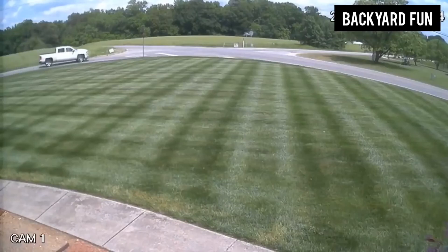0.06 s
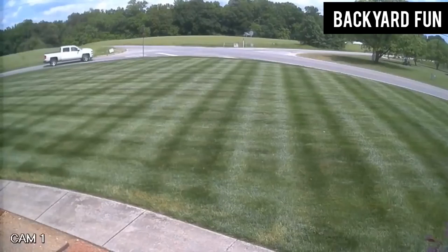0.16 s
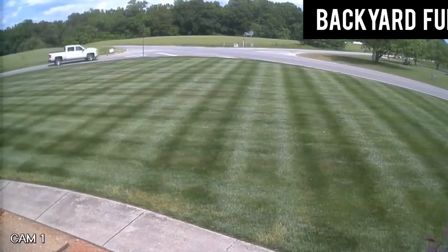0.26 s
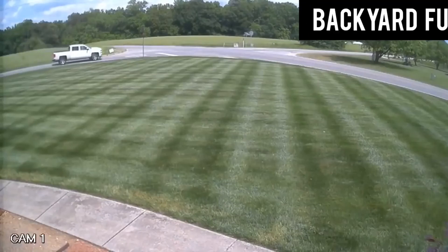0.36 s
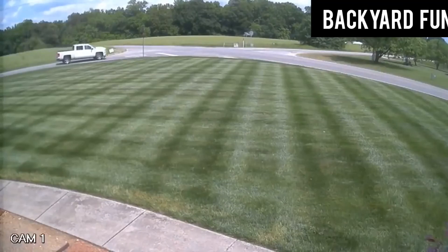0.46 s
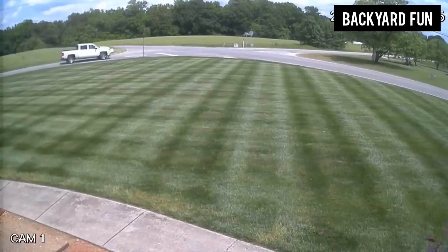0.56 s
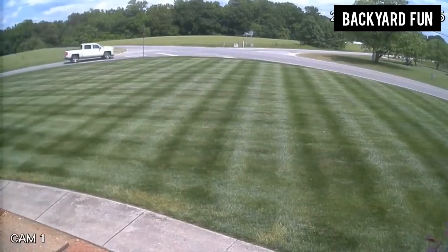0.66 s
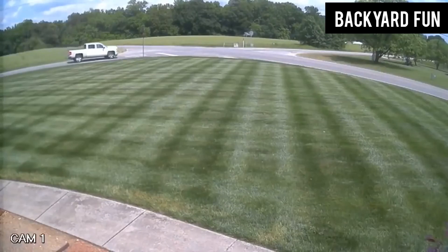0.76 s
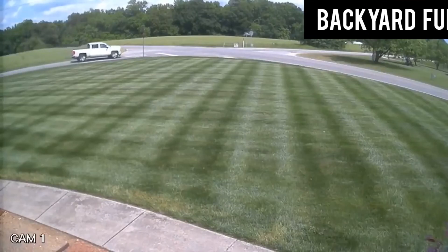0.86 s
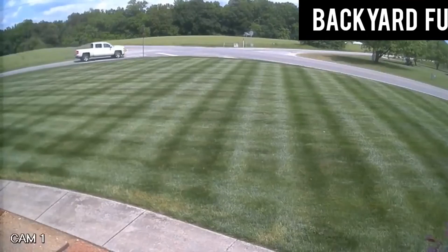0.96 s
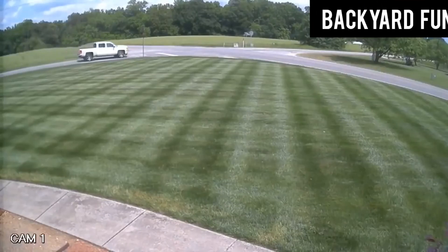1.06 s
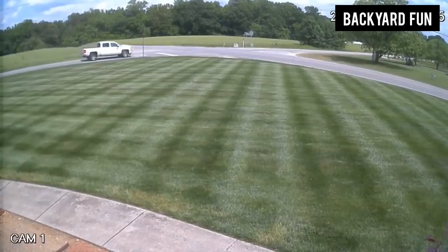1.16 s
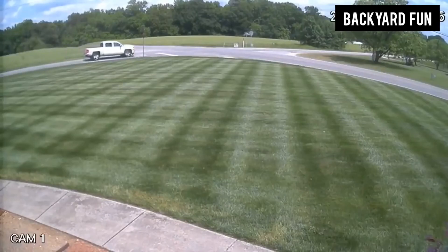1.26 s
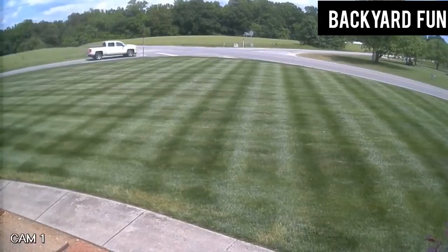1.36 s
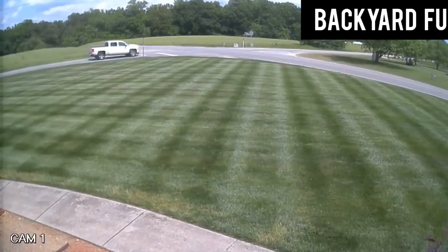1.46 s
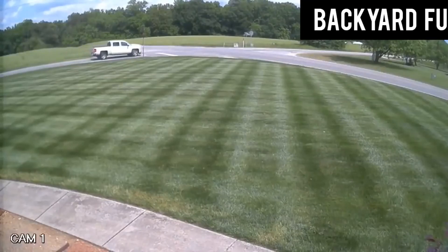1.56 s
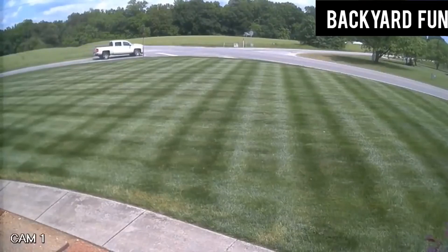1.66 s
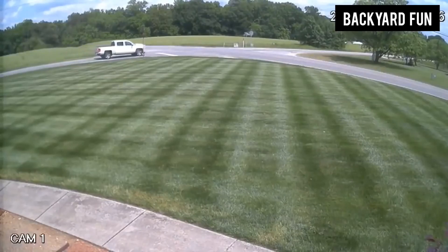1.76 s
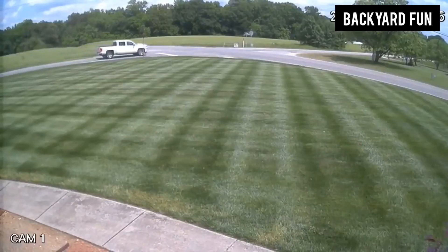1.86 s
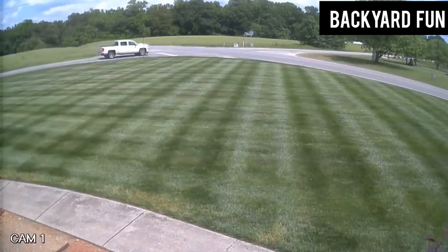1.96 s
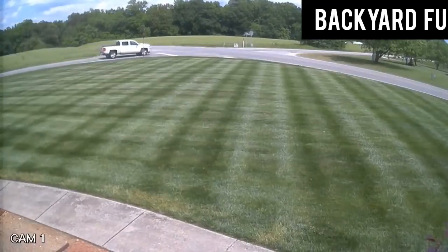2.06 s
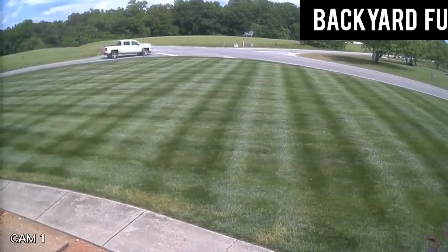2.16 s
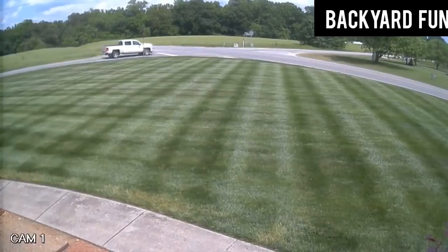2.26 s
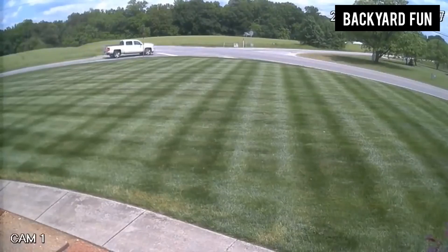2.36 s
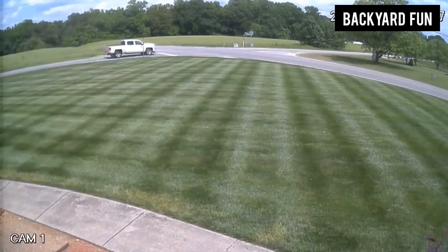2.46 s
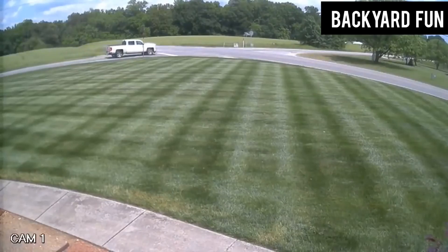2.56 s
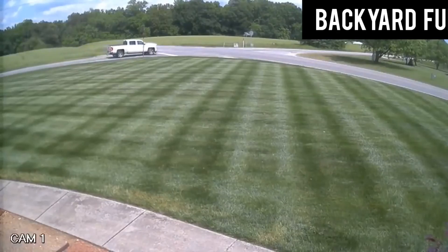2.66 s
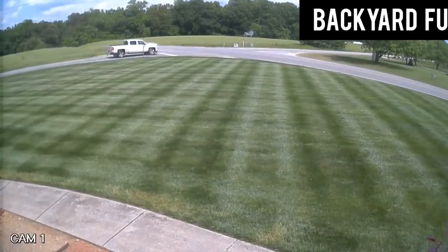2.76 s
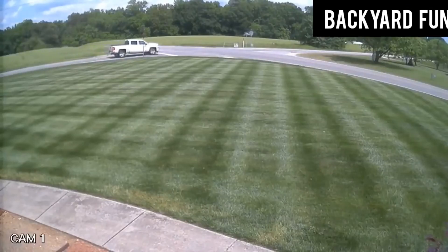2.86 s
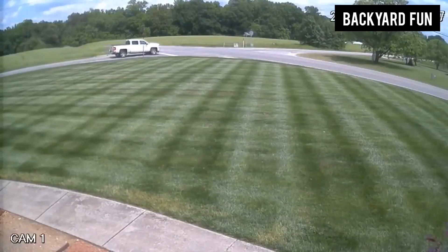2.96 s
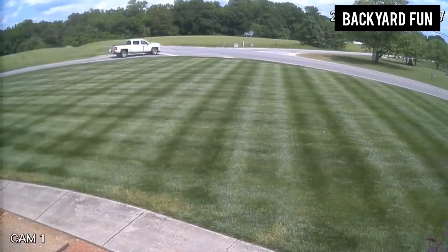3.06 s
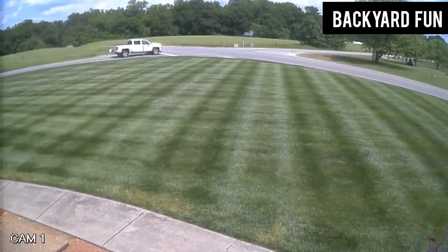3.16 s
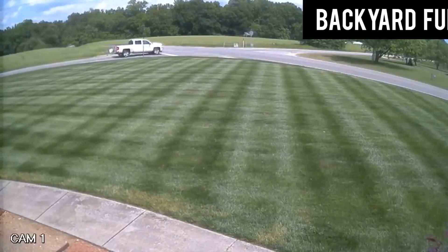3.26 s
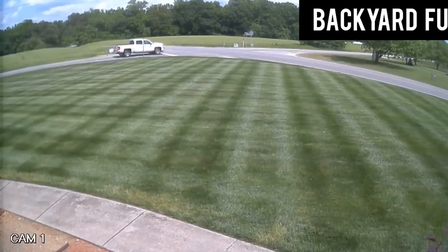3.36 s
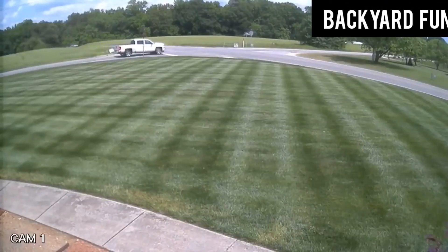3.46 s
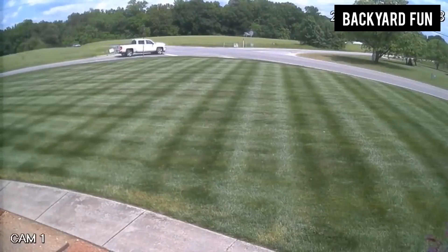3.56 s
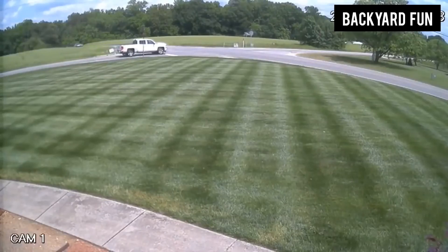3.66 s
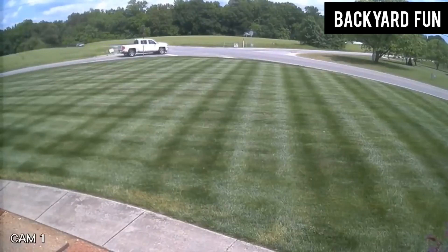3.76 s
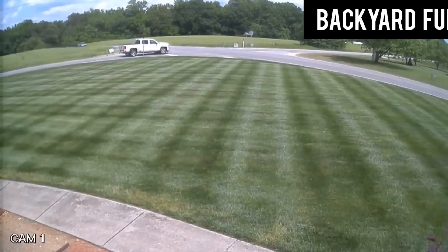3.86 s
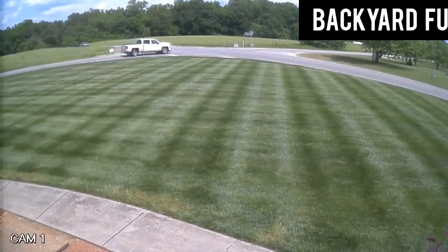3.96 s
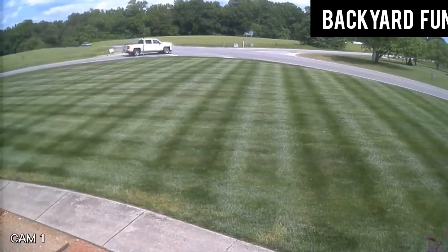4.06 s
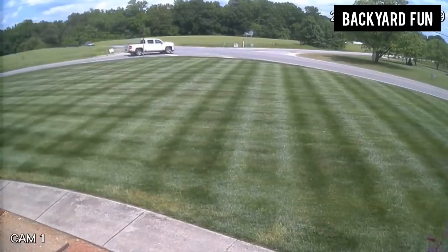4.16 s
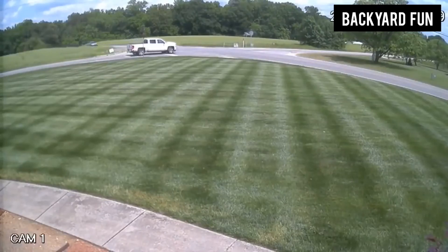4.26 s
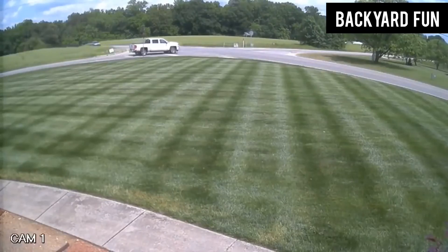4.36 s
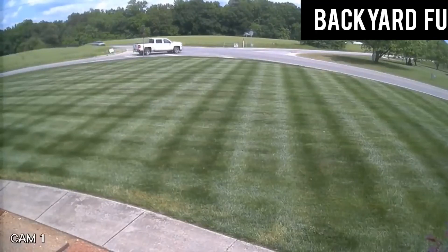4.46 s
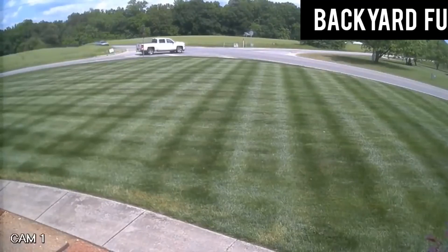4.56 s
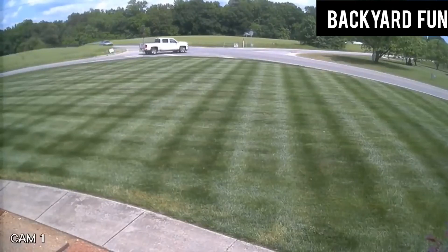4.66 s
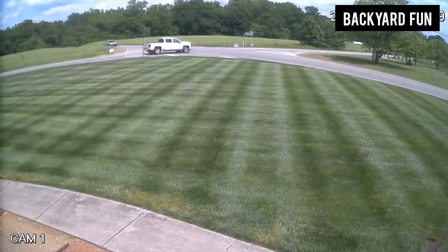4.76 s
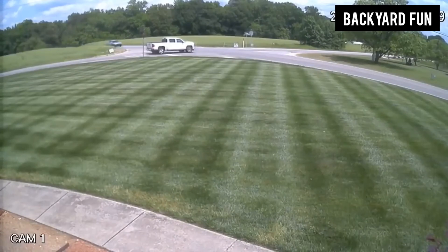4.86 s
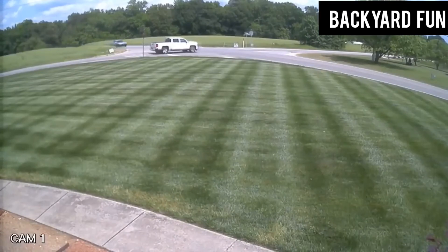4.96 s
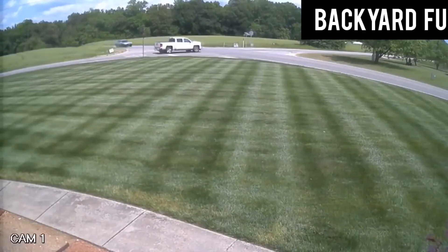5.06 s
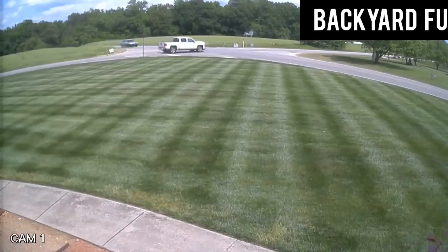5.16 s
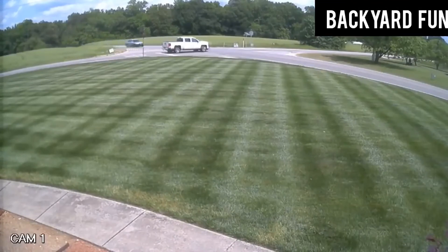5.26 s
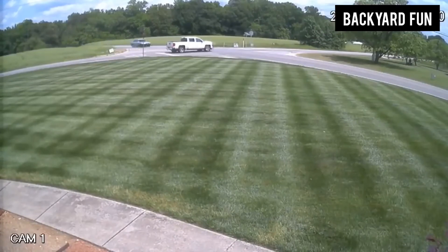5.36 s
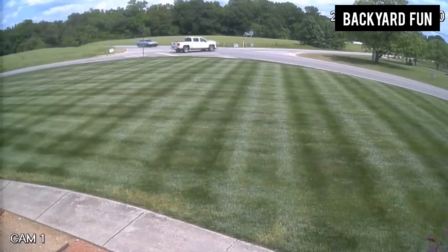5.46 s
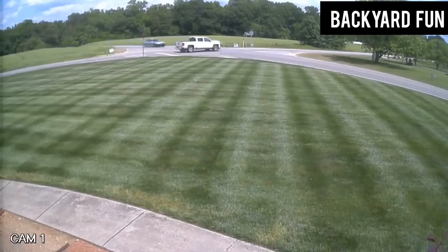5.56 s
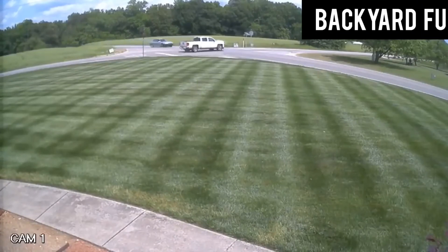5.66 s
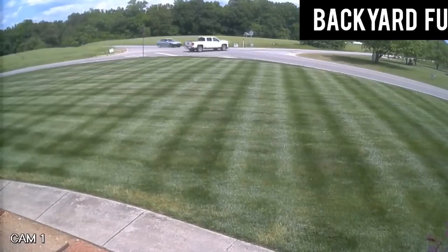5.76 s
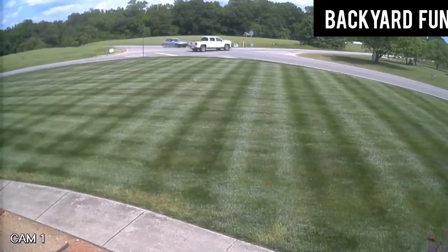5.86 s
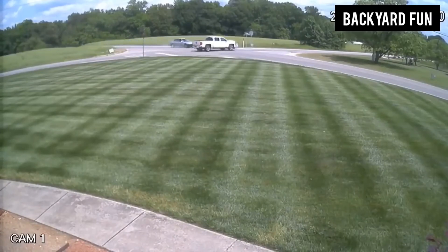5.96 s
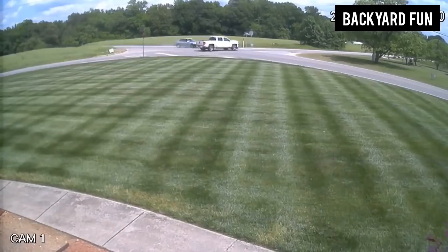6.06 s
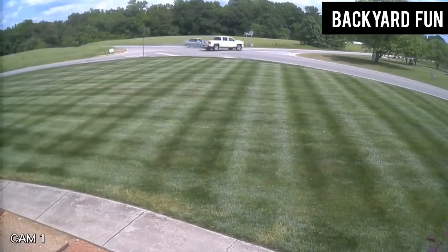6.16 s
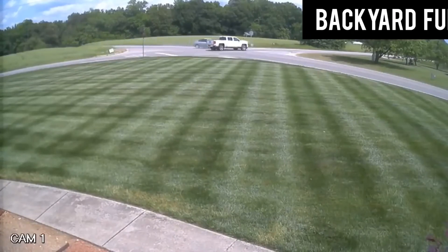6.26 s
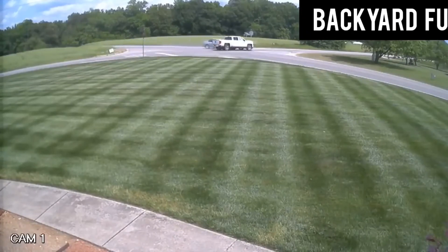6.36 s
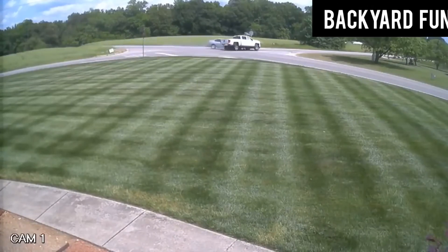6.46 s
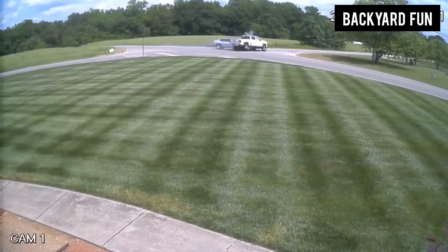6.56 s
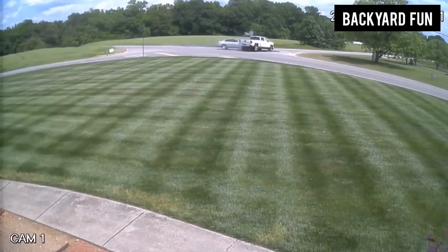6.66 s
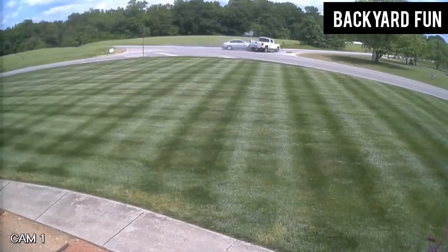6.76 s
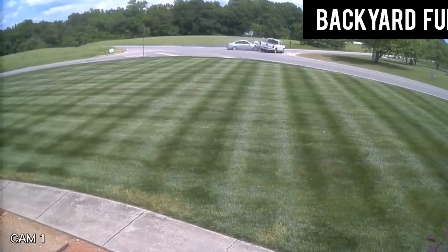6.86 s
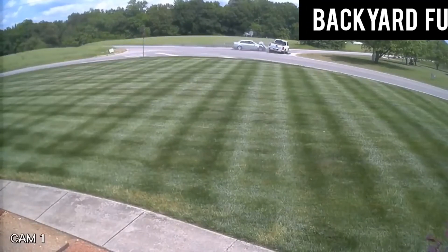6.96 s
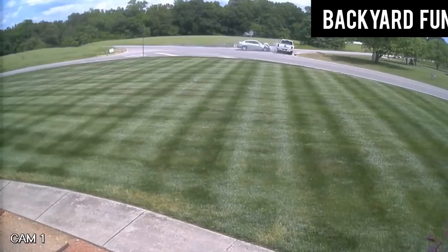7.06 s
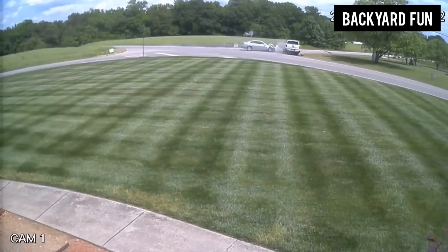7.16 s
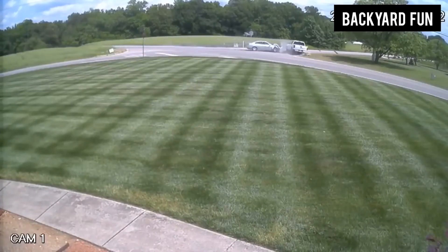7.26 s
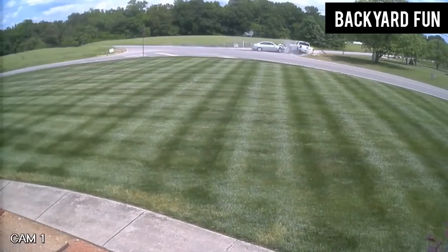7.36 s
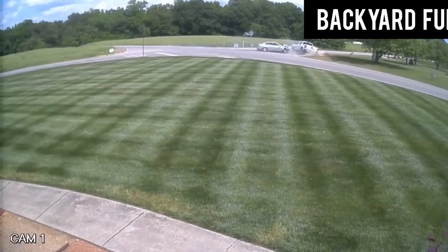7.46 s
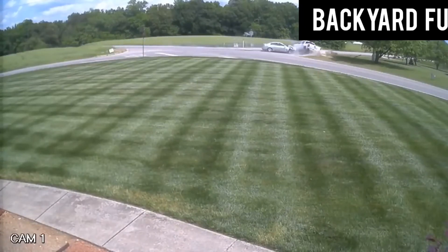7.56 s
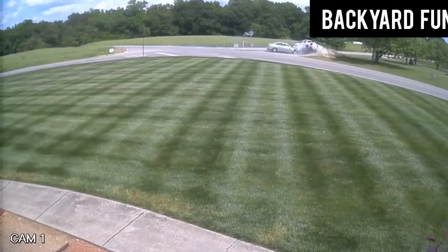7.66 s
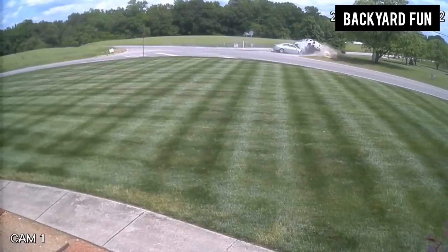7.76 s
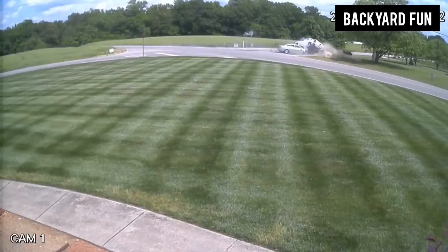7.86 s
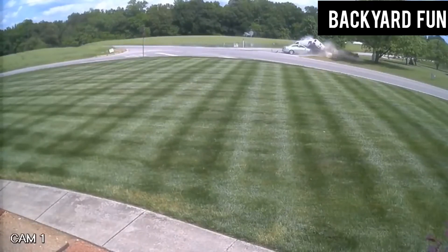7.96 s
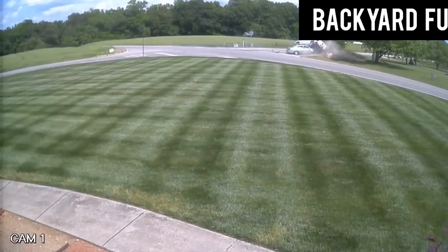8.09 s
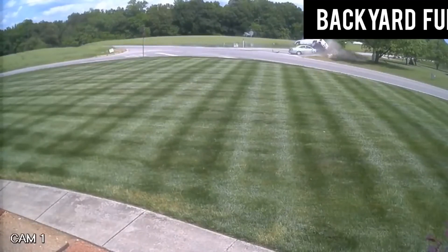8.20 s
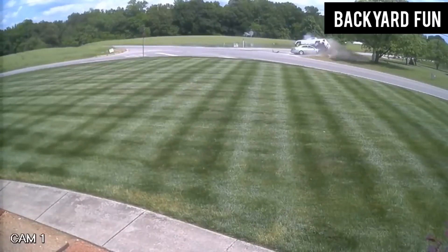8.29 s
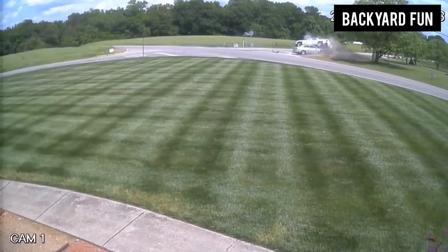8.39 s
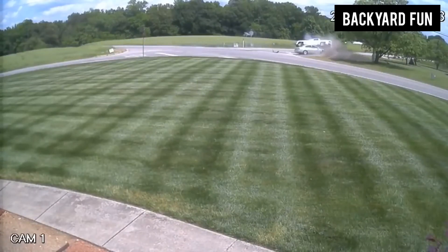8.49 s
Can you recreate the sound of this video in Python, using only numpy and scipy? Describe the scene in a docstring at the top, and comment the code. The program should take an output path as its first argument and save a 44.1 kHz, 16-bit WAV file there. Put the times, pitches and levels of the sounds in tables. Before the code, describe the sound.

Quiet roadside engine hum swells as a car nears; locked tyres squeal, two vehicles smash loudly, and wreckage howls, clanks, tumbles and lands.

```python
"""A country junction beside a lawn: a pickup rolls up while a car approaches fast.
Engines are flickering harmonics over noise for road and air; tyres chirp and squeal as shaky stick-slip tones.
The two collide in short ringing noise bursts; metal crunches and groans as they slide, built from random grains,
and the pickup tumbles and lands twice with noise thuds. Spectra fall steeply above about 2 kHz for most layers,
and the small security camera microphone overloads with bright crackle and rounds the peaks."""
import sys
import numpy as np
from scipy import signal
from scipy.fft import rfft, irfft, next_fast_len
from scipy.io import wavfile

SR = 44100
rng = np.random.default_rng(int(sys.argv[2]) if len(sys.argv) > 2 else 0)


def wrap_up_sound(samples):
    """Save the sound to the file named by the first command line argument, as 16-bit audio."""
    columns = np.atleast_2d(samples).T
    # keep every value between -1 and 1, then stretch to whole-number steps
    tamed = np.clip(columns, -1, 1)
    steps = np.round(tamed * 32767).astype(np.int16)
    wavfile.write(sys.argv[1], SR, steps)


N = 376173
T = np.arange(N) / SR


def amp(db):
    """Decibels to gain."""
    return np.exp(np.asarray(db) * (np.log(10) / 20))


def unit(x):
    """Scale to rms 1."""
    return x / np.sqrt(np.mean(x ** 2) + 1e-20)


def curves(table):
    """Columns of a table as per-sample controls, the first column being time."""
    s, *columns = np.transpose(table)
    return [np.interp(T, s, c) for c in columns]


def between(start, end, fade=0.0073):
    """1 from start to end, with short ramps outside."""
    return np.clip((T - start) / fade + 1, 0, 1) * np.clip((end - T) / fade + 1, 0, 1)


def swell(start, hold, attack_s, release_s):
    """Full strength from start for hold seconds; attack and release are the times for 20 dB."""
    before = np.maximum((start - T) / attack_s, 0)
    after = np.maximum((T - start - hold) / release_s, 0)
    return 10 ** -np.minimum(before + after, 10)


def swells(table, attack_s, release_s):
    """Joint strength of (time, hold, level) events, added as powers, that share one attack and release."""
    return np.sqrt(sum((amp(db) * swell(start, hold, attack_s, release_s)) ** 2 for start, hold, db in table))


def colour(x, points):
    """Filter by a spectrum that rolls off past its last point, keeping the power of white noise."""
    hz, db = np.transpose(points)
    size = next_fast_len(N + 4096)
    f = np.maximum(np.arange(size // 2 + 1) * SR / size, 1)
    gain = amp(np.interp(np.log(f), np.log(hz), db)) * np.minimum(hz[-1] / f, 1)
    return irfft(rfft(x, size) * unit(gain), size)[:N]


def noise(points):
    """Steady coloured noise of about rms 1."""
    return colour(rng.standard_normal(N), points)


def walk(rate):
    """Smooth random control with about rate turns a second and rms 1."""
    return unit(np.interp(T * rate, np.arange(N // 20), rng.standard_normal(N // 20)))


def grains(rate, spread_db):
    """Random clicks, rate a second; spread_db sets how unequal their sizes are."""
    hit = rng.random(N) < rate / SR
    size = amp(spread_db * np.minimum(rng.exponential(size=N), 4))
    return unit(hit * size * rng.standard_normal(N))


def porch(x, share=0.38, decay_s=.014):
    """Walls and eaves near the microphone add a few faint early reflections, which ripple the spectrum."""
    t = T[:SR // 16]
    hits = rng.random(len(t)) < 900 / SR
    taps = hits * rng.standard_normal(len(t)) * np.exp(-t / decay_s) * (t > .004)
    taps = signal.sosfilt(signal.butter(1, 400, "high", fs=SR, output="sos"), taps)
    reflections = signal.fftconvolve(x, taps * share / np.linalg.norm(taps))[:N]
    return (x + reflections) / np.hypot(1, share)


# outdoor hiss: tone as (frequency [Hz], relative density [dB])
AIR_TONE = [(200, -4), (900, -3), (2100, 1), (2800, -9), (3200, -20.5), (4000, -27), (4700, -48),
            (5900, -48.5), (7000, -61.5), (15000, -66.5)]
# its course: (time [s], level [dB])
AIR_LEVEL = [(0, -42.5), (1, -42.5), (1.7, -47.5), (4, -47)]


def air():
    """Outdoor air as broadband hiss with slow level changes."""
    return porch(noise(AIR_TONE), share=0.47) * amp(curves(AIR_LEVEL)[0])


# road noise: a steady distant bed, and the car's share, which grows until it is near
NEAR_S = 5.295


def road(far_db, near_db, rise_s):
    """Strength of a steady distant bed plus a car that draws near."""
    return np.hypot(amp(far_db), amp(near_db) * swell(NEAR_S, T[-1], rise_s, 1))


# low road noise: (frequency [Hz], relative density [dB])
RUMBLE_TONE = [(20, -28), (40, -6.5), (70, 0), (105, -3.5), (130, -1), (200, -4.5), (235, -4.5), (300, -12),
               (360, -8.5), (480, -23.5), (800, -27), (2000, -70.5)]


def rumble():
    """Low road noise, gently unsteady, that swells as the car nears."""
    return noise(RUMBLE_TONE) * road(far_db=-37, near_db=-31, rise_s=3.9) * amp(0.91 * walk(10))


# tyre roar: (frequency [Hz], relative density [dB])
ROAR_TONE = [(300, -6), (600, -1), (740, -2), (880, 5.5), (1010, -3.5), (1130, 0.5), (1280, -3.5),
             (1540, 5), (1700, 1), (1920, 3), (2150, -5.5), (2450, -20), (3300, -34.5), (5000, -74.5)]


def roar():
    """Tyre roar in the mid range, rippled by reflections and swelling as the car nears."""
    return porch(noise(ROAR_TONE), share=0.36) * road(far_db=-39.5, near_db=-29.5, rise_s=2.34) * amp(.5 * walk(9.7))


def engine(table, orders, wobble, flutter_db):
    """Harmonics brighten above the second under load; speed hunts and each line flutters over the lawn."""
    hz, db, load_db = curves(table)
    phase = 2 * np.pi * np.cumsum(hz * (1 + wobble * walk(14))) / SR
    lines = np.zeros(N)
    for k, line_db in orders:
        strength = amp(line_db + load_db * (k > 2) + flutter_db * walk(11))
        lines += strength * np.sin(round(k) * phase + 2 * np.pi * rng.random())
    return unit(lines) * amp(db)


# distant machine: (time [s], fundamental [Hz], level [dB], load: lift of the upper harmonics [dB])
HUM_COURSE = [(0, 86, -39, 3), (2.2, 85.8, -39, 1), (6.5, 86.1, -45, -2.5)]
# its harmonics: (multiple, relative level before load [dB])
HUM_ORDERS = [(1, -0.5), (2, 0), (3, -12), (4, -15), (6, -23.5)]


def distant_hum():
    """A distant machine hums on a few harmonics and fades."""
    return engine(HUM_COURSE, HUM_ORDERS, wobble=.015, flutter_db=3)


# swells of the exhaust: (time [s], hold [s], level [dB])
BOOMS = [(2.78, 0.11, -36), (3.2, .1, -41), (3.74, .2, -35.5), (4.5, .08, -34.5)]


def exhaust_boom():
    """The exhaust booms in swells at one slightly wavering resonance."""
    tone = engine([(0, 52.5, 0, 0)], [(1, 0)], wobble=.06, flutter_db=1.5)  # 52.5 Hz
    return tone * swells(BOOMS, attack_s=.2, release_s=0.66)


# pickup: (time [s], half the firing rate [Hz], level [dB], load: lift of the upper harmonics [dB])
PICKUP_COURSE = [(0, 73.13, -42.5, -12.5), (2, 71.92, -32.5, -11), (3.6, 70.63, -32.5, -1.5),
                 (4.85, 70.22, -33.5, 6), (5.8, 64.6, -50, -1.5)]
# its harmonics: (multiple, relative level before load [dB])
PICKUP_ORDERS = [(1, -10.5), (2, 2), (3, -7), (4, -11.5), (5, -14), (6, -13), (7, -28.5), (9, -20)]


def pickup():
    """The pickup's engine on multiples of half its firing rate."""
    return engine(PICKUP_COURSE, PICKUP_ORDERS, wobble=.005, flutter_db=2.5)


# approaching car: (time [s], firing rate [Hz], level [dB], load: lift of the upper harmonics [dB])
CAR_COURSE = [(0, 127.8, -54, -10), (2.5, 128, -41, -9.5), (4.7, 123.2, -32, -0.5),
              (5.5, 113.6, -36.5, 0.5), (6.4, 97.2, -52.5, -0.5)]
# its harmonics: (multiple, relative level before load [dB])
CAR_ORDERS = [(1, 0.5), (2, -8.5), (3, -19.5), (4, -16)]


def car():
    """The approaching car's engine on multiples of its firing rate."""
    return engine(CAR_COURSE, CAR_ORDERS, wobble=.004, flutter_db=2)


def traffic():
    """Engines, hum, boom and road noise together, gone within milliseconds as the collision begins."""
    return (pickup() + car() + distant_hum() + exhaust_boom() + rumble() + roar()) * between(0, 6.46)


# chassis tone: (frequency [Hz], relative density [dB])
SHUDDER_TONE = [(15, -26), (28, -2.5), (42, 3.5), (75, 4), (120, -4.5), (300, -57)]
# chassis shaken under braking and impact: (time [s], hold [s], level [dB])
SHUDDERS = [(5.65, 0.78, -30.5), (6.47, .13, -23), (6.82, .1, -30), (8.19, .08, -25.5)]


def shudder():
    """The chassis shakes at each heavy load, as deep noise."""
    return noise(SHUDDER_TONE) * swells(SHUDDERS, attack_s=0.035, release_s=.25)


def squeal(hz, jitter, jitter_rate, flutter_db, second_db, third_db):
    """Stick-slip oscillation of rms 1: the grip changes all the time, so pitch and strength shake."""
    phase = 2 * np.pi * np.cumsum(hz * (1 + jitter * walk(jitter_rate))) / SR
    second = amp(second_db + 2.6 * walk(60)) * np.sin(2 * phase)
    third = amp(third_db) * np.sin(3 * phase)
    return unit((np.sin(phase) + second + third) * amp(flutter_db * walk(110)))


# wheels locking: (time [s], hold [s], pitch [Hz], level [dB], pitch shake [share])
CHIRPS = [(5.49, 0.024, 1950, -17, .035), (5.525, 0.0056, 1994, -10, .035), (5.555, 0.019, 1957, -5, .04),
          (5.588, .07, 2523, -27.5, .08)]


def chirps():
    """Rough high stick-slip chirps as the wheels lock."""
    out = np.zeros(N)
    for start, hold, hz, db, shake in CHIRPS:
        chirp = squeal(hz, jitter=shake, jitter_rate=550, flutter_db=1.2, second_db=-41, third_db=-51.0)
        out += chirp * amp(db) * swell(start, hold, attack_s=0.035, release_s=0.031)
    return out


# how hard the locked tyres bear on the road: (time [s], load [0-1])
BRAKE_LOAD = [(5.46, 0.01), (5.6, .68), (5.86, .6), (5.96, 0.91), (6.12, 0.99), (6.22, 0.62), (6.46, 0.06)]
# scrubbing rubber: (frequency [Hz], relative density [dB])
SKID_TONE = [(30, -15.5), (170, 2), (300, -10.5), (550, -18.5), (900, -6.5), (1150, -4), (1430, 1),
             (1650, -7.5), (1930, 4), (2200, -2.5), (2600, -15.5), (3600, -38), (4900, -53), (5900, -51),
             (7500, -65.5), (9900, -62), (15000, -80)]
# bright overload noise, also played by snaps and wreck: (frequency [Hz], relative density [dB])
OVERLOAD_TONE = [(1500, -11), (3000, 12), (4200, -2), (5700, -5.5), (7500, -17), (10000, -23),
                 (15000, -34.5)]
FRONT_HZ, REAR_HZ = 1216, 1136  # unloaded tread pitches
TREAD_SAG = .07  # share by which full load lowers them
SCRUB_DB, RASP_DB = -14.5, -43.5  # at full load, before the judder
SCRUB_RANGE_DB, RASP_RANGE_DB = 14, 43.5  # drop from full load to none


def braking():
    """Two treads, lower under load, squeal over scrub, wheel judder and the rasp of the overloaded microphone."""
    load, = curves(BRAKE_LOAD)
    sag = 1 - TREAD_SAG * load
    # the front tread squeals first, the rear joins near full load
    front = squeal(FRONT_HZ * sag, jitter=.022, jitter_rate=340, flutter_db=2.4, second_db=-23, third_db=-52)
    front *= amp(-14) * swell(5.685, 0.48, attack_s=0.12, release_s=.42)
    rear = squeal(REAR_HZ * sag, jitter=.022, jitter_rate=260, flutter_db=3.5, second_db=-1, third_db=-46.5)
    rear *= amp(-15.5) * swell(5.93, 0.21, attack_s=0.12, release_s=0.12)
    scrub = noise(SKID_TONE) * amp(SCRUB_DB + SCRUB_RANGE_DB * (load - 1))
    # bright rasp of the overloaded microphone, growing steeply with load
    rasp = colour(grains(rate=10000, spread_db=0.0), OVERLOAD_TONE)
    rasp *= amp(RASP_DB + RASP_RANGE_DB * (load - 1))
    judder = amp(1.3 * walk(90))
    return porch(front + rear + scrub + rasp) * judder * between(5.49, T[-1], fade=.06) * between(0, 6.455)


# short bright snaps: (time [s], level before a 3 dB trim [dB])
SNAPS = [(5.967, -38), (6.019, -25), (6.076, -29), (7.028, -27), (7.052, -28), (7.596, -37), (7.639, -32),
         (8.098, -32), (8.143, -27), (8.172, -26.5), (8.381, -34)]
TICK_S, TICK_DB = 4.823, -35


def snaps():
    """Short bright snaps, some where the microphone overloads on loud peaks; one faint, crisp tick is earlier."""
    pulses = sum(amp(db) * (T >= start) * np.exp(-np.abs(T - start) / .003) for start, db in SNAPS)
    tick = amp(TICK_DB) * np.exp(-np.abs(T - TICK_S) / .00015) * rng.standard_normal(N)
    return noise(OVERLOAD_TONE) * pulses * amp(-3) + tick


# tyres dragged sideways:
# (time [s], hold [s], pitch [Hz], level [dB], pitch shake [share], second harmonic [dB])
HOWLS = [(6.895, 0.087, 455, -8, .14, -3.5), (7.031, .4, 455.3, -20, .14, -2.5),
         (7.139, .03, 484.6, -10, .12, -3.5), (7.305, 0.12, 949, -17, .035, -23.5)]


def howls():
    """Tyres dragged sideways howl hoarsely, mostly low, with a strongly shaken stick-slip pitch."""
    out = np.zeros(N)
    for start, hold, hz, db, shake, second_db in HOWLS:
        howl = squeal(hz, jitter=shake, jitter_rate=380, flutter_db=2,
                      second_db=second_db, third_db=second_db - 14)
        out += howl * amp(db) * swell(start, hold, attack_s=.07, release_s=.07)
    return out


# folding panels: (time [s], hold [s], starting pitch [Hz], glide [Hz per s], level [dB])
SHRIEKS = [(6.62, 0.0064, 860, 2, -13), (6.68, 0.031, 980, 3501, -8.5), (6.737, 0.041, 1700, 3802, -14.5),
           (8.457, 0.019, 611.4, -4, -16)]


def shrieks():
    """Panels shriek with gliding pitch as they fold and groan as the wreck settles."""
    out = np.zeros(N)
    for start, hold, hz, glide, db in SHRIEKS:
        pitch = hz + glide * np.clip(T - start, 0, hold)
        shriek = squeal(pitch, jitter=110 / hz, jitter_rate=650, flutter_db=2.5, second_db=-24, third_db=-38)
        out += shriek * amp(db) * swell(start, hold, attack_s=.04, release_s=.045)
    return out


def clanks(rate, ring_s, spread_db):
    """Loose parts struck at random, each ringing briefly at its own pitch."""
    out, t = np.zeros(N), T[:SR // 8]
    for when, pitch, size, damping in rng.random((int(rate * N / SR), 4)):
        i, hz = int(when * (N - len(t))), 300 + 1850 * pitch
        ring = np.exp(-t / (ring_s * (.5 + damping))) - np.exp(-t / 0.0018)
        out[i:i + len(t)] += amp(spread_db * size) * ring * np.sin(2 * np.pi * hz * t)
    return unit(out)


# buckling bodywork: (frequency [Hz], relative density [dB])
CRUNCH_TONE = [(120, -23.5), (300, 0), (450, 1.5), (600, 1), (780, 1), (930, 3.5), (1220, -4.5), (1400, 2),
               (1650, -1.5), (1980, 3.5), (2400, -10), (3200, -25), (4500, -47.5), (9000, -80)]
# bodywork crushed in the collision and as the pickup rolls: (time [s], hold [s], drive before the mix [dB])
CRUNCHES = [(6.6, 0.076, -16), (6.735, 0.017, -14), (7.045, 0.059, -15), (7.635, 0.013, -19),
            (8.096, 0.08, -14), (8.33, 0.026, -20.5)]
# heavy shells: (frequency [Hz], relative density [dB])
THUD_TONE = [(20, -32.5), (40, -15.5), (75, -6.5), (125, -3), (180, 1), (235, -8.5), (330, -10),
             (700, -29.5), (2000, -83.5)]
# the shells hit each other and the ground: (time [s], level [dB])
THUDS = [(6.599, -12), (7.584, -9), (7.68, -17), (7.83, -22), (8.11, -14), (8.205, -13)]
# between the blows the wrecks scrape along, quieter as they slow
SLIDE_S, SCRAPE_DB, SLIDE_THUD_DB, SLOWING_DB_PER_S = 6.6, -16.5, -23.5, 5.5
# overload crackle: level at a crunch of 0 dB before the clatter, and dB gained per dB of crunch
CRACKLE_DB, CRACKLE_GROWTH = -8.5, 2.11


def wreck():
    """Countless small fractures ring the bodywork, loose parts clank, shells thud and overload crackles."""
    scrape = amp(SCRAPE_DB - SLOWING_DB_PER_S * np.maximum(T - SLIDE_S, 0))
    crush = np.hypot(scrape, swells(CRUNCHES, attack_s=.07, release_s=0.18))
    fractures = porch(colour(grains(rate=5000, spread_db=1.5), CRUNCH_TONE), share=.5)
    parts = colour(clanks(rate=260, ring_s=.022, spread_db=10), CRUNCH_TONE)
    metal = 1.33 * unit(fractures) + .6 * unit(parts)
    # bright overload crackle that grows faster than the crunch
    crackle = colour(grains(rate=4600, spread_db=4.0), OVERLOAD_TONE)
    crackle *= amp(CRACKLE_DB) * crush ** CRACKLE_GROWTH
    clatter = amp(1.4 * walk(130))  # parts give way in clusters
    blows = swells([(start, 0, db) for start, db in THUDS], attack_s=0.16, release_s=0.2)
    thuds = noise(THUD_TONE) * np.hypot(amp(SLIDE_THUD_DB), blows)
    return ((metal * crush + crackle) * clatter + thuds) * between(SLIDE_S, T[-1], fade=.015)


# short bursts of the blow, with gaps where the overloaded microphone chokes:
# (time [s], length [s], level before the noise and ring mix [dB], ring [Hz])
BURSTS = [(6.462, 0.0027, -8, 356), (6.471, .009, -8, 885), (6.4848, .0033, -2.5, 1664),
          (6.4952, .002, -3, 900), (6.5056, .005, -8, 1713), (6.514, .0025, -2, 993),
          (6.527, .007, -2.5, 1230), (6.5372, .005, -6, 1810), (6.547, .0058, -8.5, 1480),
          (6.5544, .0018, -4, 387), (6.561, 0.005, -7.5, 1400), (6.5737, .004, -2.5, 1486),
          (6.58, .006, -9, 1090)]
# the blow: (frequency [Hz], relative density [dB])
BLOW_TONE = [(30, -2), (120, 8.5), (900, 3), (2100, -1.5), (2800, -7), (4000, -22.5), (5500, -37.5),
             (8000, -45.5), (15000, -60)]


def collision():
    """Short ringing bursts of the blow, with gaps where the overloaded microphone chokes; crumpling fills in."""
    bursts, rings = np.zeros(N), np.zeros(N)
    for start, length, db, hz in BURSTS:
        i = np.arange(int(start * SR), int((start + length) * SR))
        shape = signal.windows.tukey(len(i), .5) * amp(db)
        bursts[i] += shape
        rings[i] += shape * np.sin(2 * np.pi * (hz * (T[i] - start) + rng.random()))
    # a rough random noise level rises under the bursts and thickens into crumpling
    rough = unit(amp(6 * walk(450))) * between(6.475, 6.605)
    crumple = rough * amp(-14) * swell(6.62, 1, attack_s=0.18, release_s=1)
    return colour((.75 * bursts + crumple) * rng.standard_normal(N) + .36 * rings, BLOW_TONE)


def scene():
    """All layers summed to one channel, with no long reverberant tail."""
    approach = air() + traffic() + shudder() + chirps() + braking()
    crash = snaps() + howls() + shrieks() + wreck() + collision()
    return (approach + crash)[None]


def rounded(x, ceiling):
    """Soft saturation that leaves quiet sound alone."""
    return x / (1 + (x / ceiling) ** 6) ** (1 / 6)


def record(dry):
    """The camera microphone overloads with dull corners, its amplifier rounds what is left, and the top is cut."""
    # only the change made by each rounding is low-passed, so the sound itself stays bright
    dull = signal.butter(2, 3800, fs=SR, output="sos")
    loaded = dry + signal.sosfiltfilt(dull, rounded(dry, .85) - dry)
    soft = signal.butter(1, 7000, fs=SR, output="sos")
    out = loaded + signal.sosfiltfilt(soft, rounded(loaded, 1.15) - loaded)
    return signal.sosfilt(signal.ellip(8, .2, 70, 15800, fs=SR, output="sos"), out)


dry = scene()
out = record(dry)
wrap_up_sound(out)
```